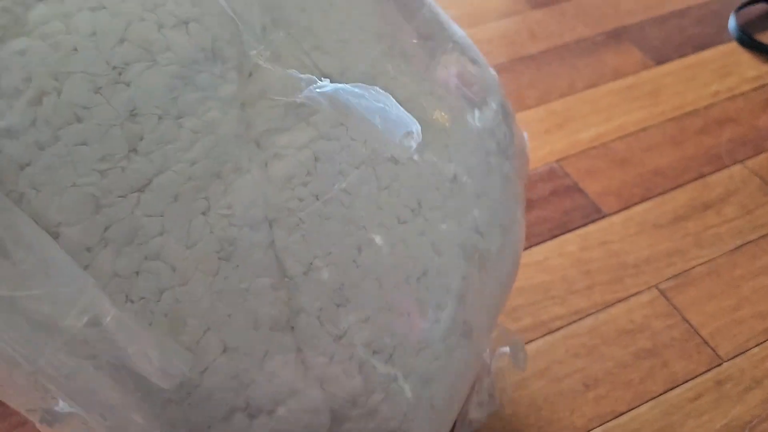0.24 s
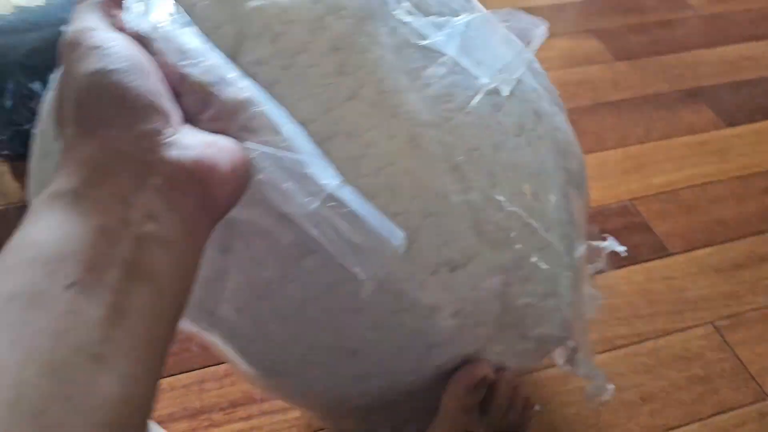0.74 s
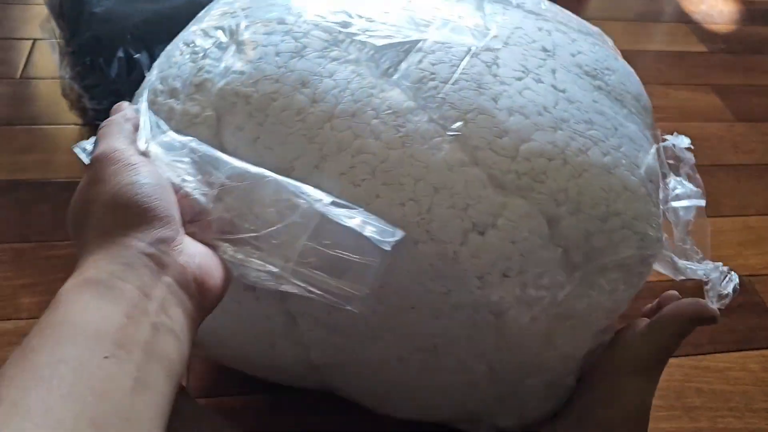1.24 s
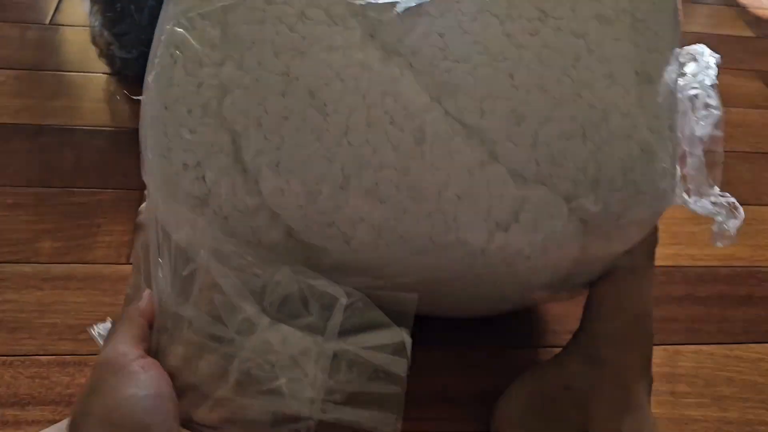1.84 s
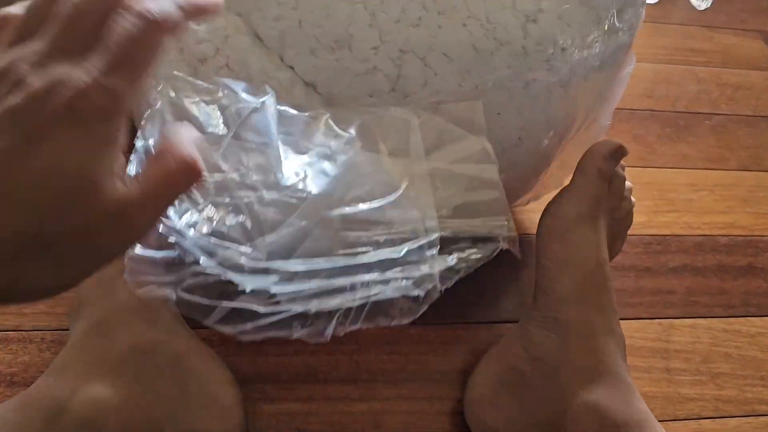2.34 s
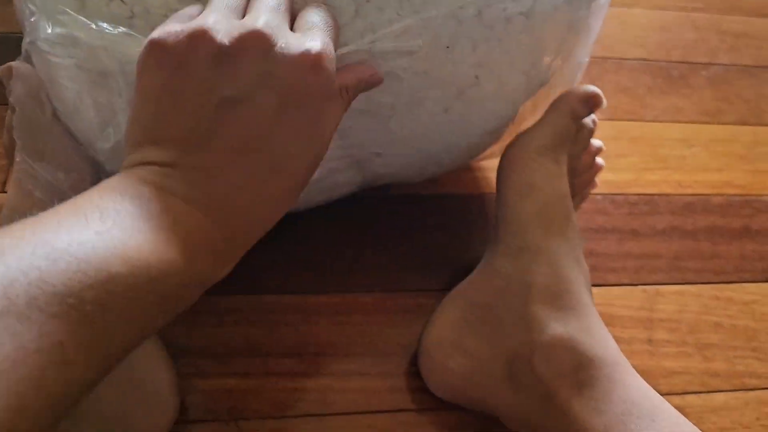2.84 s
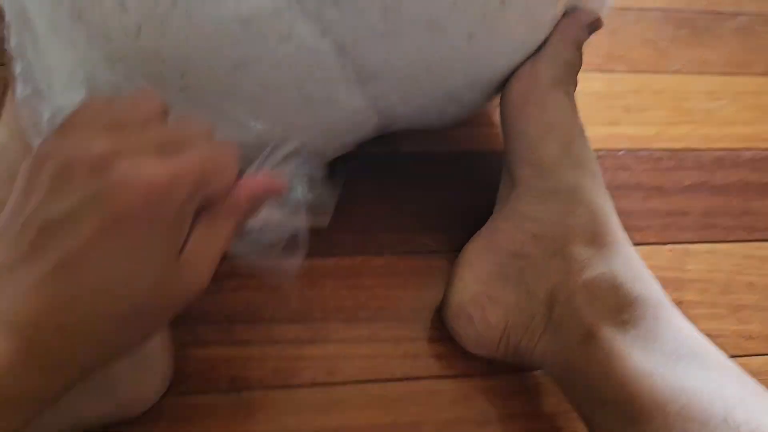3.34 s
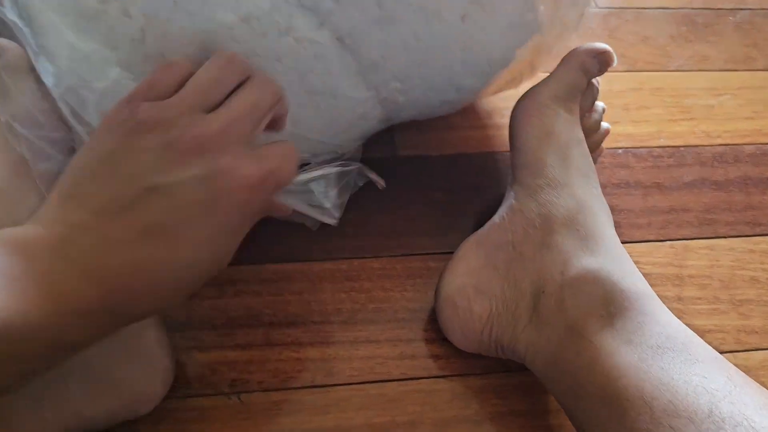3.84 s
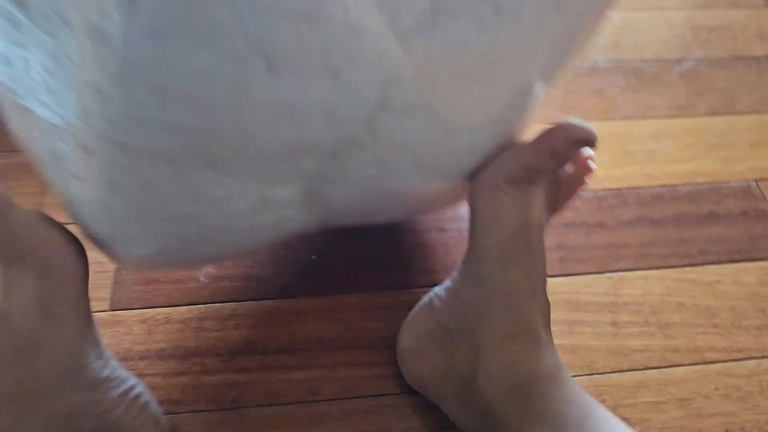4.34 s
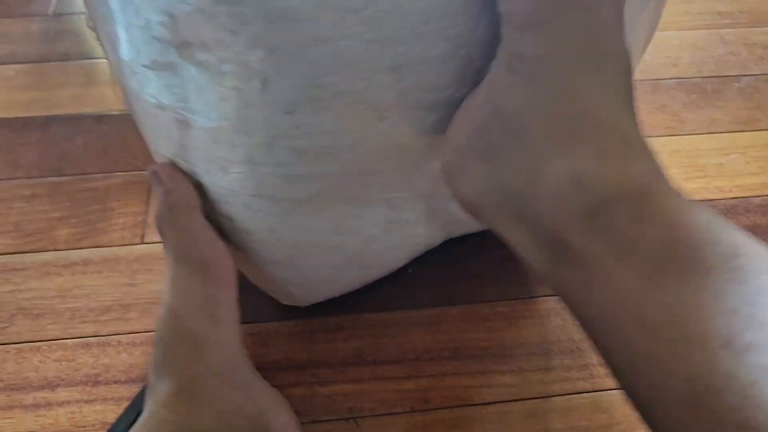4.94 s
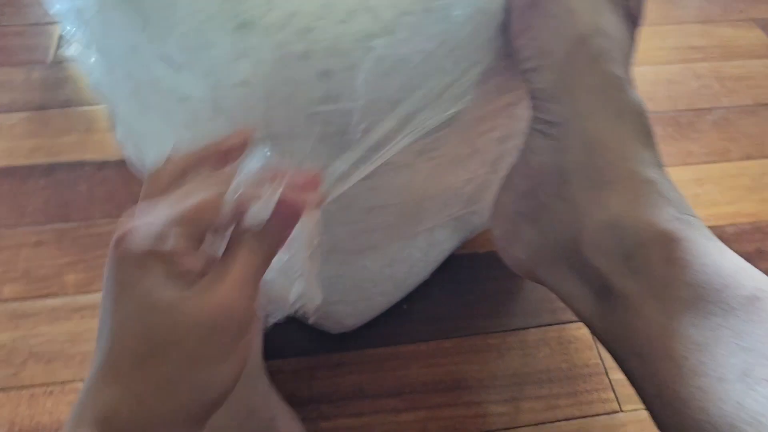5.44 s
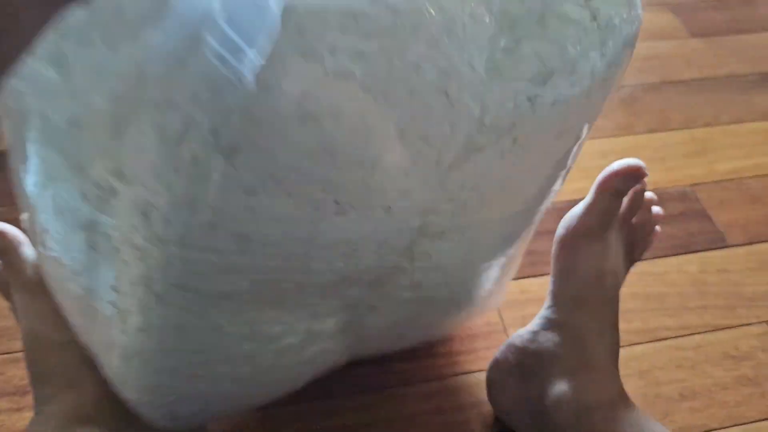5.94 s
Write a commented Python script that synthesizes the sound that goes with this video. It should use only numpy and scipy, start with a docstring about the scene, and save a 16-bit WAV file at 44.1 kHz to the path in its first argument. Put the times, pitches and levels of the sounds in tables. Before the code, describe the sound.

Plastic wrap crinkles and snaps as hands pull it off a soft bale, with three short sharp rips and dull bumps in a small room.

```python
"""Hands pull plastic wrap and tape off a soft, tightly packed bale, close up on a wooden floor.
First the bale is bumped, a taut fold pops, and the film crinkles, snaps and squeals under the fingers.
At 1.6 s it rips: quick slips drum on the taut wrap, which groans, then slackens and flaps.
More handling leads to rips at 3.3 s and 5.4 s, and the last bumps and crinkles follow.
A small hard room rings behind it all."""
import sys
import numpy as np
from scipy import signal
from scipy.fft import rfft, irfft, next_fast_len
from scipy.io import wavfile
from scipy.ndimage import map_coordinates

SR = 44100
rng = np.random.default_rng(int(sys.argv[2]) if len(sys.argv) > 2 else 0)


def store_pcm(level_fs):
    """Save levels as 16-bit WAV."""
    pcm = np.round(np.clip(level_fs, -1, 1) * 32767).astype(np.int16)
    wavfile.write(sys.argv[1], SR, np.atleast_2d(pcm).T)


N = 273420

# Room tone: frequency_hz, level_db
ROOM_TONE_EQ = [(15, -46), (25, -4), (102, -1), (439, -11.5), (775, -7), (1740, -30.5), (2550, -20),
                (5280, -20.5), (10100, -25), (16000, -22)]
# Decay of the room: frequency_hz, t60_s
ROOM_DECAY = [(100, 0.22), (260, 0.59), (700, 0.4), (1900, 0.48), (5000, 0.44), (13000, 0.39)]
# Colour of the reverb: frequency_hz, gain_db
REVERB_EQ = [(100, 4), (300, 0), (1000, -1), (3000, 4), (6500, 2.5), (10000, 1.5), (16000, -2)]
# Stereo image of the room: frequency_hz, left_right_likeness
ROOM_IMAGE = [(100, 0.87), (350, 0.77), (700, 0.63), (1300, 0.029), (2500, 0.037), (15000, 0.05)]
# Stereo image of direct sound: frequency_hz, left_right_likeness
DIRECT_IMAGE = [(100, 0.98), (400, 0.99), (900, 0.51), (2000, 0.43), (6000, 0.05), (15000, 0.043)]
# Mismatch of the microphone ports: frequency_hz, left_over_right_db
PORT_BALANCE = [(60, 2.5), (200, 4), (1300, 1), (2400, 0.5), (4400, -3), (8000, 1.5), (13000, 0)]
# Bumps on the bale: start_s, level_db, pitch_hz, t60_s
BALE_BUMPS = [(.005, -19, 76, 0.1), (3.102, -33, 57.1, 0.37), (4.329, -9, 70, 0.041),
              (4.525, -31.5, 53.8, 0.31), (5.53, -23, 105.4, 0.193), (5.917, -27.5, 52.3, 0.54)]
# Shoves over the floor: start_s, length_s, level_db
BALE_SHOVES = [(0, .12, -48.5), (0.21, 0.99, -50), (1.008, 0.33, -58), (1.455, 0.56, -49.5),
               (3.25, 0.093, -35), (4.94, 0.069, -51.5), (5.403, 0.11, -42.5), (5.643, 0.18, -59),
               (5.884, 0.14, -43.5)]
# Rumble of the shifting bale: frequency_hz, level_db
RUMBLE_EQ = [(20, -5.5), (53, 7.5), (80, 3), (110, 4.5), (160, -3.5), (260, -8), (500, -27), (1100, -77)]
# Squeals: skin on the film, and at 4.66 s a foot: start_s, length_s, level_db, pitch_hz
SQUEAKS = [(.375, .075, -57, 2100), (.48, .05, -53, 1895), (.56, .13, -62, 1895),
           (4.66, .17, -59, 760)]
# Resonances of the taut wrap: centre_hz, width_hz, gain_db
WRAP_MODES = [(212, 78, -5.5), (289, 28.7, -1), (365, 22, -3), (502, 85, -5), (792, 92, -2.5)]
# Palms scuffing the wrap: start_s, length_s, level_db
PALM_SCUFFS = [(1.165, 0.1, -56), (1.838, 0.15, -50), (2.131, 0.083, -49), (2.29, .07, -59),
               (5.39, 0.051, -39.5), (5.775, 0.066, -45)]
# Hand strokes over the film, the loud row at 3.218 s being the first tearing of the second rip: start_s,
# length_s, level_db, edge_offset_db, rubbing_offset_db
HAND_STROKES = [(0, 0.031, -32.5, 0.5, -4), (0.03, 0.092, -39.5, -2.5, -4), (0.286, 0.42, -51.5, 4.5, -3),
                (0.623, 0.3, -57.5, 1, -3), (0.835, 0.25, -48.5, 4.5, 1), (1.102, 0.15, -43.5, 3, -4),
                (1.255, 0.18, -51.5, 2.5, -3.5), (1.426, 0.14, -63, 4, 2.5),
                (1.558, 0.028, -40.5, 11.5, -4.5), (1.979, 0.11, -52, -1, -3.5),
                (2.104, 0.2, -52, -0.5, -5.5), (2.327, 0.22, -73, -9, 9.5), (2.573, 0.16, -50.5, -3, -2.5),
                (2.801, 0.044, -29.5, 3.5, -12), (2.897, 0.1, -53, -17, 8.5), (3.047, 0.073, -56, -6, 1.5),
                (3.218, 0.058, -24.5, 2, -6.5), (3.54, 0.085, -54, -2, -10), (3.725, 0.28, -53.5, 0, -5),
                (4.02, 0.11, -46.5, 8, -5), (4.159, 0.15, -51, 6, -5), (4.492, .17, -57.5, 6, -2),
                (4.623, 0.25, -53, 1.5, -3), (4.878, 0.49, -47, 3, -3.5), (5.273, 0.27, -36.5, 8, -10.5),
                (5.721, 0.083, -46.5, 1, -4), (5.761, 0.12, -37.5, 2, -5.5), (5.92, 0.2, -51, 5, -6),
                (6.051, 0.15, -43.5, 3, -4.5)]
# Rustle of handled film: frequency_hz, level_db
RUSTLE_EQ = [(120, -45), (200, -1.5), (289, -8), (473, -14), (696, -11.5), (1350, -7), (1710, -8.5),
             (2170, 5), (2610, 4.5), (6170, 7.5), (9930, -9.5), (11500, -7.5), (16000, -3)]
# Slack wrap hitting the bale: start_s, level_db, contact_s
WRAP_FLAPS = [(0.0930,-22,0.0022), (0.878,-28,0.00023), (1.692,-14.5,0.00048), (1.74,-17,0.0013),
              (3.113,-35,0.0011), (3.357,-43,0.00053), (4.222,-32,0.00053), (4.232,-33,0.00072),
              (4.3276,-18,0.00019), (4.522,-27,0.0037), (5.54,-12.5,0.00023), (5.781,-30.5,0.0007),
              (5.8,-38,0.0011), (5.92,-27.5,0.006)]
# Tone of the popping fold: frequency_hz, gain_db
POP_EQ = [(100, -20), (300, -3.5), (1600, 5.5), (2600, 0.5), (4400, 2), (6800, 6), (9000, -9), (11000, -7),
          (16000, -2)]
# The bale screens the pop's direct path: frequency_hz, gain_db
BALE_SHADOW = [(100, -1), (4500, -2), (6500, -14), (9000, -31), (16000, -6)]
# Groans of the stretched wrap: start_s, length_s, level_db, first_pitch_hz, rise_hz_per_s
WRAP_GROANS = [(1.586, 0.029, -26.5, 220.2, 754), (1.655, .028, -21.5, 275, 760),
               (1.73, .05, -32, 325, 400), (3.324, 0.044, -20, 226.1, 900), (5.462, .082, -25.5, 170, 1176)]
# The loudest snaps of the film: start_s, level_db, body_offset_db, edge_offset_db
FILM_SNAPS = [(0.2438, -34.5, 25, -8), (0.3112, -37, 6.5, -23), (0.383, -40.5, 6, -9),
              (0.446, -36.5, 13, -5), (0.833, -21.5, -5, 8), (0.876, -21.5, -30, -2.5),
              (1.1346, -32.5, 11.5, -8), (1.1534, -28, 10.5, -10), (1.5717, -28, -12, -5),
              (1.5846, -17, -6, 4), (1.6121, -13, 1, -8.5), (1.6334, -11.5, -6, -18),
              (1.6845, -12, 7, -7.5), (1.7012, -12.5, -1, -17), (1.735, -8.5, 6, -6.5),
              (2.3796, -41.5, -1, -9.5), (2.593, -35, -10, -12), (2.6145, -33, 6, 1),
              (2.6357, -33, 6, -7.5), (2.6857, -34.5, 3, -3), (2.7138, -33.5, 13.5, -3.5),
              (2.7408, -27, 10, 0), (2.792, -23.5, 1.5, -2.5), (2.812, -22.5, -5, 0), (2.817, -33, 1, 0),
              (2.8279, -19, 3.5, -5.5), (2.8342, -23.5, -5, -3), (2.846, -23, 7, -2.5), (2.911, -22, 3, -4),
              (2.9206, -16, 6.5, -2.5), (2.94, -21, 6, -6), (3.0318, -22, 3.5, -0.5),
              (3.1127, -34, 16.5, -8), (3.208, -20, -6, 0), (3.2245, -11, 10.5, -5),
              (3.2466, -11, 10.5, -3.5), (3.2794, -15, 22, -1.5), (3.289, -13, -19, -11),
              (3.3038, -8, 19, 0), (3.553, -36, -6, -1), (3.6084, -35, 8.5, -5), (3.736, -50, -12, -3),
              (3.7618, -37.5, -12, -4), (3.8584, -38, 13, -1.5), (3.9082, -28.5, 5, -1.5),
              (3.9249, -28.5, 7, -7), (4.092, -44, 2, 3), (4.2193, -18, -2, 4), (4.2307, -17, 12, 10),
              (4.2417, -28.5, 8, -29), (4.2632, -19.5, 5, 4.5), (4.2693, -22, 8, -7), (4.28, -15, 12, 4.5),
              (4.3195, -31.5, -13, -30), (4.3265, -16, 8.5, -1.5), (4.488, -44, -5, 8),
              (4.5453, -33, 9, -2), (4.629, -41, -13, -4), (4.8636, -39, -1, 3), (4.9281, -30, 9.5, -4),
              (5.0403, -35, -15, -5), (5.1246, -36.5, -9, -8), (5.2286, -29.5, -15, 2),
              (5.2858, -27.5, 2.5, -24), (5.3705, -16, -4, 5), (5.4162, -31, 18.5, 9.5),
              (5.4283, -20, 14, 3), (5.4457, -15, 11, 3), (5.541, -16.5, 20, -3), (5.8065, -22, -17, -5.5),
              (5.847, -18.5, -23, 5), (5.8714, -20, 8.5, -2), (5.9703, -27.5, 7, 2),
              (6.0649, -34.5, 18, 5.5), (6.1352, -30, 9, 0), (6.161, -24.5, 8.5, -15)]
# Tone of one snap: frequency_hz, gain_db
SNAP_EQ = [(100, -6), (300, -6.5), (850, -4), (2100, -1), (4500, 1), (6500, 2.5), (9800, -1.5), (11500, 1),
           (16000, 5.5)]
# The three rips: start_s, length_s, time_to_crest_s, crest_db, build_db, edge_offset_db,
# final_body_db, final_drumming_db, ring_hz, pan_db
FILM_RIPS = [(1.588, 0.14, 0.04, -18, 3, -0.5, -22, -22, 1080, 0),
             (3.289, 0.0766, .04, -21, 2, 1, -19.5, -14.5, 1496, -3),
             (5.366, 0.1671, .135, -14.5, 12, -0.5, -17.5, -27, 940, -1.5)]
# Tone of tearing film: frequency_hz, level_db
TEAR_EQ = [(300, -24.5), (560, -8), (790, -8.5), (1050, -11), (1250, -8.5), (1480, -5), (1900, -8),
           (3300, -3.5), (5200, -2.5), (6800, -4.5), (9800, -11), (12000, -7.5), (15600, -10.5)]

HAND_ATTACK_S, HAND_RELEASE_S = 0.004, 0.0068
PRE_ROLL_S = .01  # room ahead of each crack, since evening out its spectrum smears a little of it earlier


def amp(db):
    """Decibels to gain."""
    return 10 ** (np.asarray(db) / 20)


def unit(x):
    """Scale to rms 1."""
    return x / np.sqrt(np.mean(x ** 2) + 1e-20)


def pan(db):
    """Channel gains that put left db above right."""
    return amp([[db / 2], [-db / 2]])


def along(points, hz):
    """Read a curve on a log frequency axis."""
    knots_hz, values = np.transpose(points)
    return np.interp(np.log(hz + 1), np.log(knots_hz + 1), values)


def wobble(rate):
    """A smooth random curve, rate knots a second."""
    return map_coordinates(rng.standard_normal(int(N * rate / SR) + 4), [np.arange(N) * rate / SR])


def envelope(start, length, attack_s, release_s):
    """Gain that rises from start, holds until start + length, then dies away."""
    age = np.arange(N) / SR - start
    return np.clip(age / attack_s, 0, 1) * np.exp(-np.clip((age - length) / release_s, 0, 20))


def add(track, start, sound):
    """Mix a sound in at start seconds."""
    i = max(round(start * SR), 0)
    part = sound[..., :max(N - i, 0)]
    track[..., i:i + part.shape[-1]] += part


def filtered(x, response):
    """Apply a complex frequency response."""
    n = x.shape[-1]
    size = next_fast_len(n + SR // 20, True)
    return irfft(rfft(x, size) * response(np.fft.rfftfreq(size, 1 / SR)), size)[..., :n]


def coloured(x, *curves, size=2048):
    """Minimum-phase EQ from the sum of the given dB curves."""
    hz = np.fft.rfftfreq(size, 1 / SR)
    gain = amp(sum(along(curve, hz) for curve in curves))
    cepstrum = irfft(np.log(np.maximum(gain, 1e-6)))
    cepstrum[1:size // 2] *= 2
    cepstrum[size // 2 + 1:] = 0
    kernel = irfft(np.exp(rfft(cepstrum)))
    return signal.fftconvolve(x, kernel[None], axes=1)[:, :x.shape[1]]


def bands(x, *edges_hz):
    """Crossover: one band upward of each edge, each of rms 1."""
    above = [filtered(x, lambda hz: 1 - 1 / (1 + (hz / edge) ** 12)) for edge in edges_hz]
    return [unit(a - b) for a, b in zip(above, above[1:] + [0])]


def stereo(pair, image, lead_ms=0):
    """Blend two unrelated signals to a stereo image; left leads by lead_ms, less in the bass."""
    turn = lambda hz: np.arccos(np.clip(along(image, hz), -1, 1)) / 2
    mid, side = filtered(pair, lambda hz: np.array([np.cos(turn(hz)), np.sin(turn(hz))]))
    lag = lambda hz: lead_ms / 1000 * hz ** 2 / (hz ** 2 + 550 ** 2)
    right = filtered(mid - side, lambda hz: np.exp(-2j * np.pi * hz * lag(hz)))
    return np.array([mid + side, right])


def slips(rate, scatter, spread_db, count=9000):
    """Stick-slip impulses of uneven gap and size; the rate per second may vary."""
    gap, size = rng.standard_normal((2, count))
    progress = np.cumsum(rate * np.ones(N)) / SR
    at = np.searchsorted(progress, np.cumsum(np.exp(scatter * gap - scatter ** 2 / 2)))
    strength = amp(spread_db * np.clip(size, -2, 2))
    return np.bincount(at[at < N], strength[at < N], N)


def bursts(impulses, life_ms):
    """Each impulse sets off a short shower of tiny fractures."""
    decay = np.exp(-1000 / (life_ms * SR))
    return signal.lfilter([1], [1, -decay], impulses) * rng.standard_normal((2, N))


def room_tone(level_db=-56):
    """A steady bed of soft, dark noise."""
    return amp(level_db) * unit(stereo(coloured(rng.standard_normal((2, N)), ROOM_TONE_EQ), ROOM_IMAGE))


def reverb(send, build_s=0.00092, tail_count=16):
    """The room's diffuse answer, crossfading from tail to tail as the hands move about."""
    out, t = np.zeros((2, N)), np.arange(N) / SR
    centres = np.linspace(0, t[-1], tail_count)
    for centre in centres:
        hz, age, noise = signal.stft(rng.standard_normal((2, SR * 2 // 3)), SR, nperseg=256)
        decay = amp(-60 * age / along(ROOM_DECAY, hz)[:, None])
        tail = signal.istft(noise * decay, SR, nperseg=256)[1]
        tail *= 1 - np.exp(-(np.arange(tail.shape[1]) / SR / build_s) ** 2)
        tail /= np.linalg.norm(tail[0])
        share = np.maximum(1 - np.abs(t - centre) / centres[1], 0)
        active = share > 0
        add(out, t[active][0], signal.fftconvolve((send * np.sqrt(share))[:, active], tail, axes=1))
    return stereo(filtered(out, lambda hz: amp(along(REVERB_EQ, hz))), ROOM_IMAGE)


def bale(resting_db=-57.5, bump_attack_s=0.026):
    """The soft mass wobbles when bumped, rumbles when shoved and never quite lies still."""
    bumps, t = np.zeros((2, N)), np.arange(SR // 2) / SR
    swell = 1 - np.exp(-t / bump_attack_s)
    for start, db, hz, t60 in BALE_BUMPS:
        add(bumps, start, amp(db - 60 * t / t60) * swell * np.sin(2 * np.pi * hz * t))
    rumble = stereo(coloured(rng.standard_normal((2, N)), RUMBLE_EQ), DIRECT_IMAGE)
    lumps = amp(2.5 * wobble(22))
    shoves = sum(amp(db) * envelope(start, length, attack_s=0.013, release_s=0.069)
                 for start, length, db in BALE_SHOVES)
    return bumps + np.hypot(shoves, amp(resting_db)) * unit(rumble * lumps)


def squeaks(octave_db=-10.5):
    """Skin drags on the film, and later a foot squeaks, each with a faint, rough squeal."""
    out = np.zeros(N)
    for start, length, db, hz in SQUEAKS:
        pitch = hz * (1 + .008 * wobble(25) + .07 * wobble(600))  # drift and rasp
        phase = 2 * np.pi * np.cumsum(pitch) / SR
        tone = np.sin(phase) + amp(octave_db) * np.sin(2 * phase)
        out += amp(db) * envelope(start, length, attack_s=0.024, release_s=0.034) * tone
    return out * amp(4.4 * wobble(120.2))


def drumhead(hz):
    """Resonant response of the wrap stretched over the bale."""
    return sum((-1) ** k * amp(db) * 1j * hz * width / (centre ** 2 - hz ** 2 + 1j * hz * width)
               for k, (centre, width, db) in enumerate(WRAP_MODES))


def scuffs(dull_hz=400):
    """A palm catches and slips on the wrap, which murmurs at its low resonances."""
    catches = bursts(slips(rate=120, scatter=.5, spread_db=3), life_ms=2)
    murmur = filtered(catches, lambda hz: drumhead(hz) / (1 + (hz / dull_hz) ** 2))
    pressure = sum(amp(db) * envelope(start, length, HAND_ATTACK_S, HAND_RELEASE_S)
                   for start, length, db in PALM_SCUFFS)
    return pressure * unit(stereo(murmur, DIRECT_IMAGE))


def crinkle(pan_db=2, sag_db_per_s=12.5, sliding_db=-4):
    """In each stroke tiny creases buckle one by one while fingers slide over the film."""
    crackling, edge, rubbing = np.zeros((3, N))
    for start, length, db, edge_db, rub_db in HAND_STROKES:
        age = np.maximum(np.arange(N) / SR - start, 0)
        press = amp(db - sag_db_per_s * age) * envelope(start, length, HAND_ATTACK_S, HAND_RELEASE_S)
        crackling = np.maximum(crackling, press)
        edge = np.maximum(edge, amp(edge_db) * press)
        rubbing = np.maximum(rubbing, amp(rub_db) * press)
    ticks = unit(bursts(slips(rate=150, scatter=.7, spread_db=6), life_ms=.9))
    sliding = amp(sliding_db + 1.5 * wobble(45)) * rng.standard_normal((2, N))
    film = stereo(coloured(ticks + sliding, RUSTLE_EQ), DIRECT_IMAGE, lead_ms=0.249)
    low, middle, high = bands(film, 160, 1900, 8500)
    return (rubbing * low + crackling * middle + edge * high) * pan(pan_db)


def flaps(trim_db=-1):
    """Loose wrap slaps the bale: one push through the stretched film; shorter contacts knock harder."""
    out, t = np.zeros((2, N)), np.arange(SR // 8) / SR
    for start, db, contact_s in WRAP_FLAPS:
        push = t / contact_s * np.exp(-t / contact_s)
        thud = filtered(push, lambda hz: drumhead(hz) + 0.15 * hz ** 2 / (hz ** 2 + 200 ** 2))
        add(out, start, amp(db + trim_db) * thud / np.abs(thud).max())
    return out


def pop(start_s=.0935, level_db=-3, rebound_s=.00023):
    """A taut fold lets go behind the bale: a pulse, smeared by the film, and its quick rebound."""
    out = np.zeros((2, N))
    pulse = coloured(np.eye(1, SR // 50), POP_EQ)
    pulse = filtered(pulse, lambda hz: np.exp(-1j * np.pi * hz * .0008 * hz / 8000))  # highs lag
    pulse *= amp(level_db) / np.abs(pulse).max()
    add(out, start_s, pulse)
    add(out, start_s + rebound_s, .35 * pulse)
    return out


def groans():
    """The stretched wrap rings like a rough drumhead whose pitch rises with its tension."""
    out = np.zeros(N)
    for start, length, db, hz, rise in WRAP_GROANS:
        age = np.clip(np.arange(N) / SR - start, 0, length)
        pitch = (hz + rise * age) * (1 + .13 * wobble(180))
        tone = np.sin(2 * np.pi * np.cumsum(pitch) / SR)
        out += amp(db) * envelope(start, length, attack_s=0.0069, release_s=.008) * tone
    return out * amp(2 * wobble(130))


def crack(life_s=0.0028, attack_s=.0005, evenness=0.56):
    """A noise transient with its spectrum evened out, so that it has no pitch."""
    t = np.maximum(np.arange(SR // 25) / SR - PRE_ROLL_S, 0)
    shape = np.exp(-(t / life_s) ** 1.3) * (1 - np.exp(-t / attack_s))
    spectrum = rfft(shape * rng.standard_normal((2, len(t))))
    magnitude = np.abs(spectrum)
    return irfft(spectrum / (magnitude + magnitude.mean() / 10) ** evenness, len(t))


def snaps(pan_db=1, pan_scatter_db=4):
    """A crease flips: a crack of a few milliseconds, with its own brightness and direction."""
    out = np.zeros((2, N))
    for start, db, body_db, edge_db in FILM_SNAPS:
        direction = unit(pan(pan_db + pan_scatter_db * rng.standard_normal()))
        tilt = [(150, 0), (600, body_db), (1200, body_db), (3200, 0), (7000, 0), (11000, edge_db)]
        snap = stereo(coloured(crack(), SNAP_EQ, tilt), DIRECT_IMAGE, lead_ms=0.294)
        snap /= np.sqrt(np.sum(snap ** 2) / (2 * .005 * SR))  # the energy of 5 ms at rms 1
        add(out, start - PRE_ROLL_S, snap * amp(db) * direction)
    return out


def rips():
    """The tear runs in slips that quicken with the pull; each cracks and plucks the stretched wrap."""
    crest_slips_per_s, rate_doubling_db = 310, 7
    ease_db_per_s, edge_ease_db_per_s = 42, 49  # past its crest the tear eases and dulls
    body_growth_db, drum_growth_db = 11.5, 18  # over one rip, as the pull stretches the wrap
    ring_db, ring_width_hz = 6, 140  # the freed strip rings, heavily damped
    t, out = np.arange(N) / SR, np.zeros((2, N))
    slack_db = sum(build_db * np.maximum(1 - (t - start) / crest_s, 0) * (t >= start)
                   for start, _, crest_s, _, build_db, *_ in FILM_RIPS)
    steps = slips(crest_slips_per_s / 2 ** (slack_db / rate_doubling_db), scatter=.35, spread_db=2.8)
    film = stereo(coloured(bursts(steps, life_ms=1.7), TEAR_EQ), DIRECT_IMAGE, lead_ms=0.242)
    low, middle, high = bands(film, 480, 2200, 8500)
    plucks = unit(stereo(filtered(bursts(steps, life_ms=1.0), drumhead), DIRECT_IMAGE))
    for start, length, crest_s, db, _, edge_db, body_db, drum_db, ring_hz, pan_db in FILM_RIPS:
        age = np.clip(t - start, 0, length)
        to_go, past_crest = 1 - age / length, np.maximum(age - crest_s, 0)
        rasp = amp(-ease_db_per_s * past_crest) * middle
        edge = amp(edge_db - edge_ease_db_per_s * past_crest) * high
        tear = amp(db - slack_db) * (rasp + edge) * pan(pan_db)
        strip = unit(filtered(low, lambda hz: amp(ring_db / (1 + ((hz - ring_hz) / ring_width_hz) ** 2))))
        body = amp(body_db - body_growth_db * to_go) * strip
        drumming = amp(drum_db - drum_growth_db * to_go) * plucks
        out += envelope(start, length, attack_s=0.0013, release_s=0.0013) * (tear + body + drumming)
    return out


def scene(film_send_db=-8, groan_send_db=-14, pop_send_db=-1):
    """Film and bale up front, the room around them; the groan carries less far than the cracks."""
    film = snaps() + rips() + crinkle() + flaps()
    groan, far_pop = groans(), pop()
    wet = reverb(amp(film_send_db) * film + amp(groan_send_db) * groan + amp(pop_send_db) * far_pop)
    background = room_tone() + wet + bale()
    return background + squeaks() + scuffs() + coloured(far_pop, BALE_SHADOW) + groan + film


def record(dry, port_hz=11500, width_hz=550, port_db=4, top_hz=15900):
    """The microphone ports ring in the treble and differ in colour; then a soft clip and a high cut."""
    ring_db = lambda hz: port_db / (1 + ((hz - port_hz) / width_hz) ** 2)
    balance_db = lambda hz: along(PORT_BALANCE, hz) * np.array([[1], [-1]]) / 2
    picked_up = filtered(dry, lambda hz: amp(ring_db(hz) + balance_db(hz)))
    rounded = picked_up / (1 + np.abs(picked_up) ** 6) ** (1 / 6)
    return filtered(rounded, lambda hz: hz < top_hz)


dry = scene()
out = record(dry)
store_pcm(out)
```